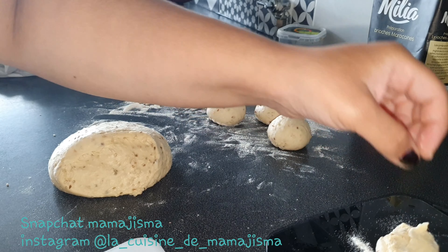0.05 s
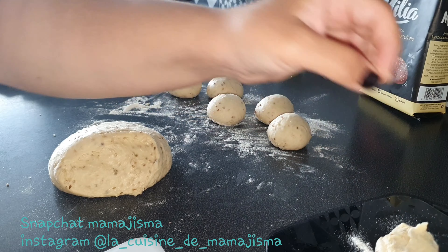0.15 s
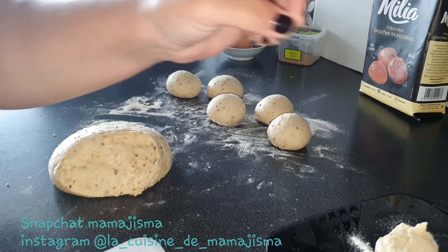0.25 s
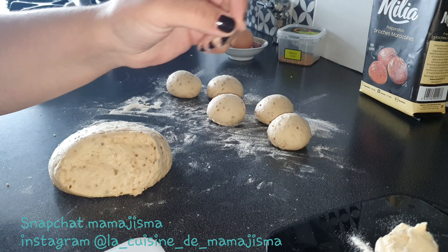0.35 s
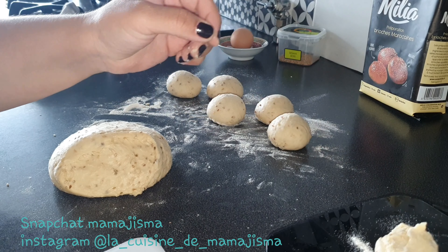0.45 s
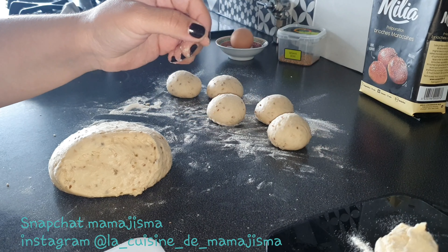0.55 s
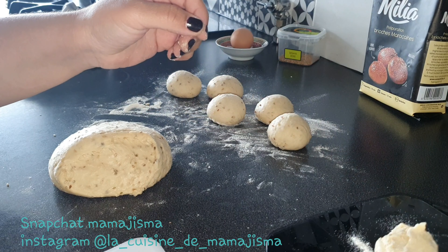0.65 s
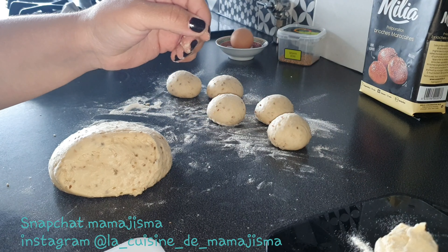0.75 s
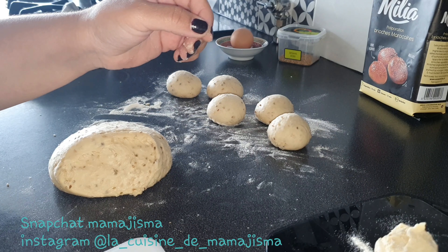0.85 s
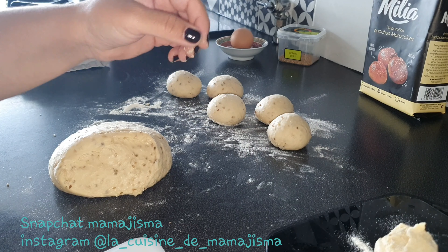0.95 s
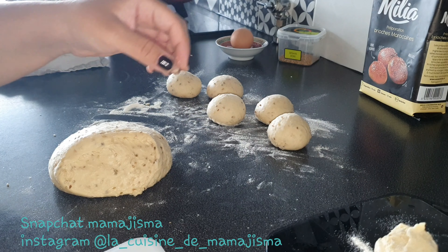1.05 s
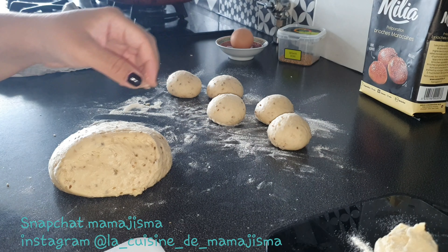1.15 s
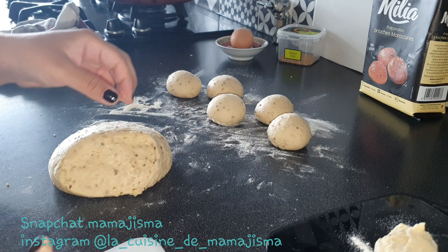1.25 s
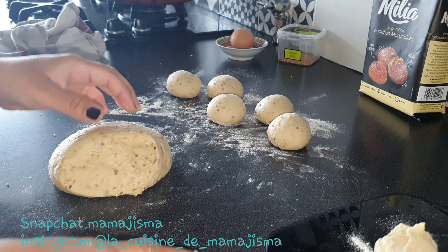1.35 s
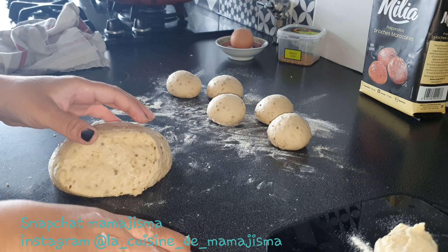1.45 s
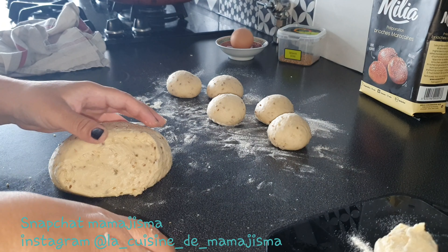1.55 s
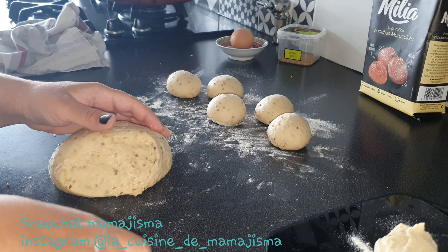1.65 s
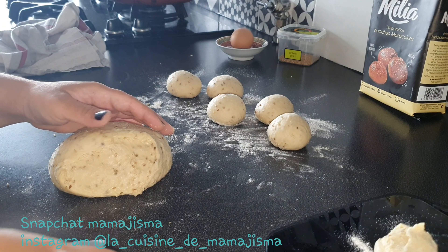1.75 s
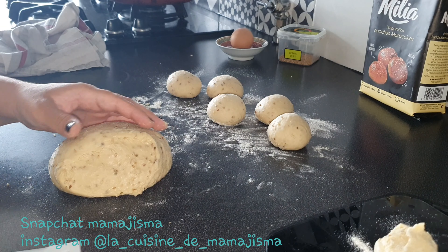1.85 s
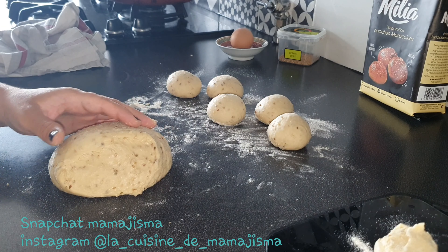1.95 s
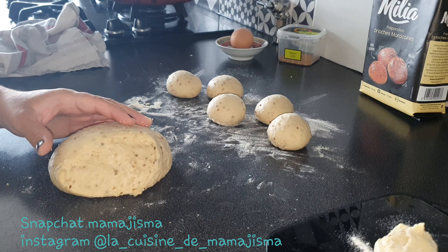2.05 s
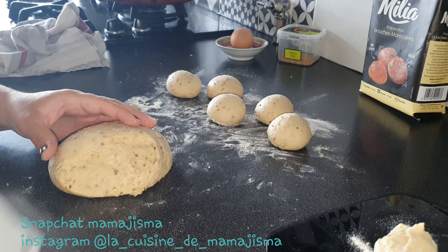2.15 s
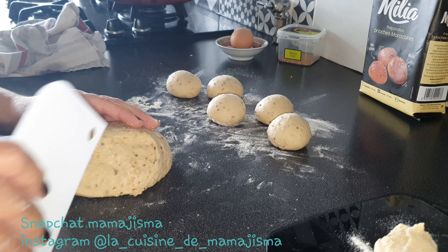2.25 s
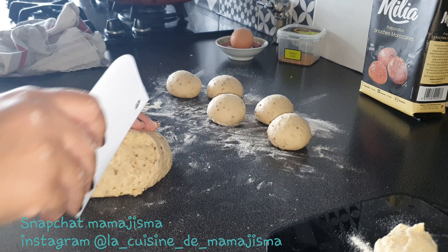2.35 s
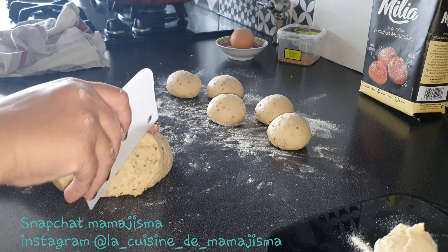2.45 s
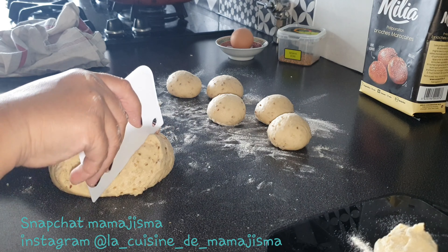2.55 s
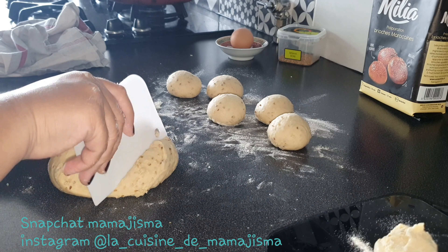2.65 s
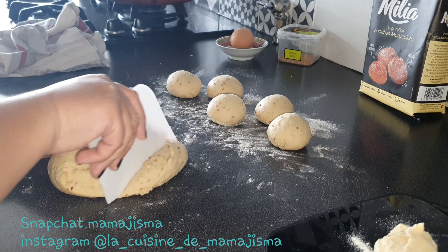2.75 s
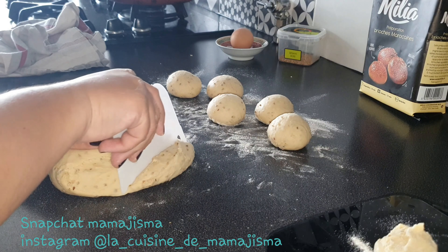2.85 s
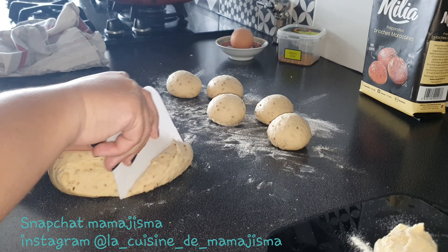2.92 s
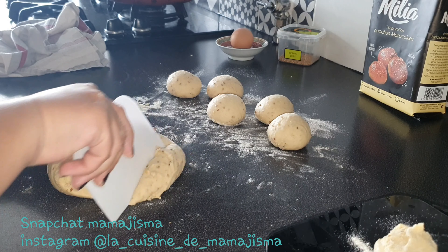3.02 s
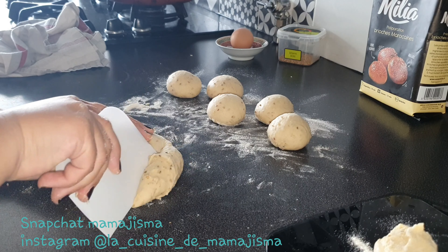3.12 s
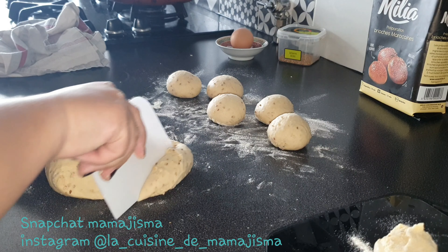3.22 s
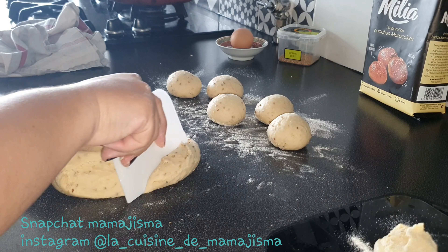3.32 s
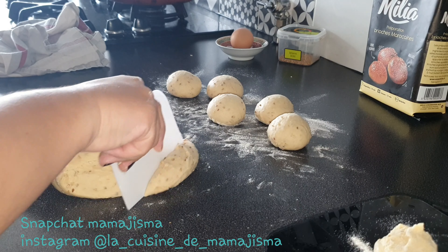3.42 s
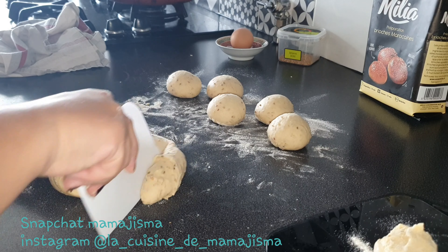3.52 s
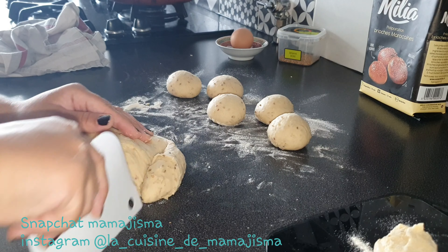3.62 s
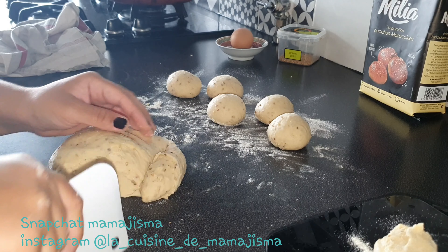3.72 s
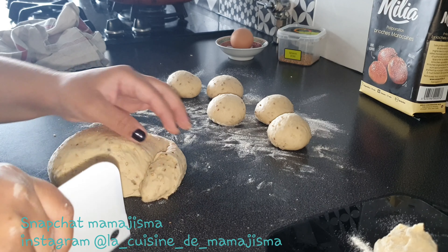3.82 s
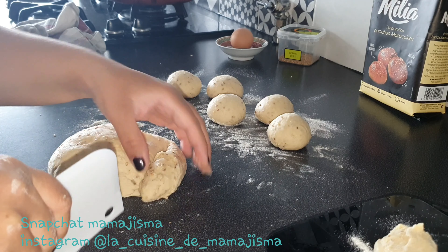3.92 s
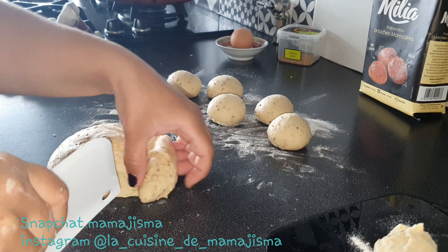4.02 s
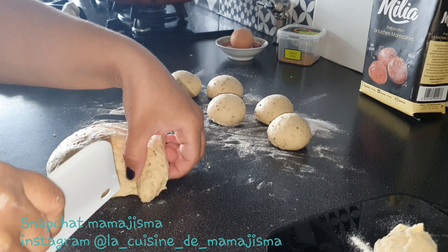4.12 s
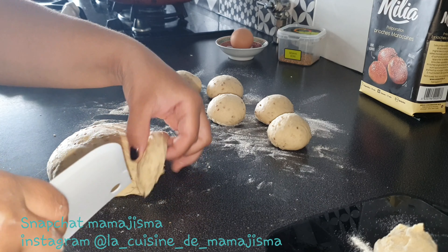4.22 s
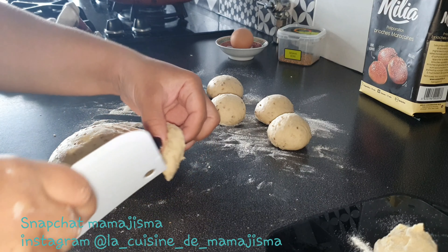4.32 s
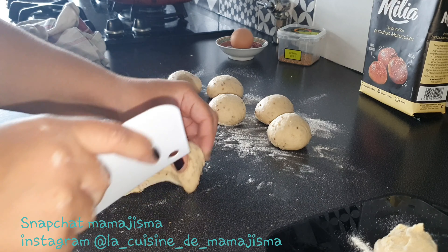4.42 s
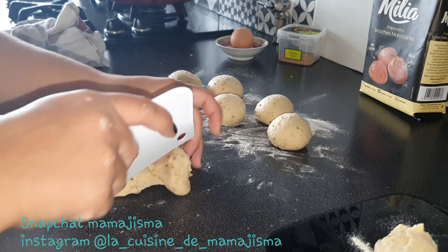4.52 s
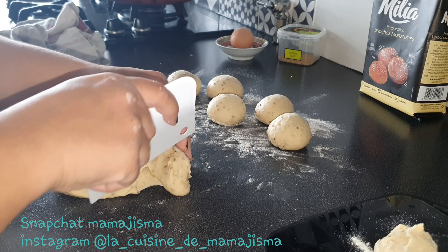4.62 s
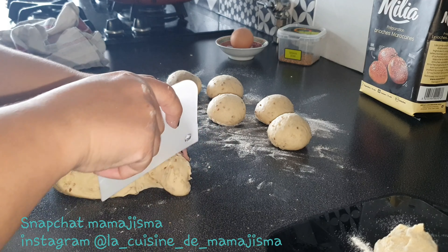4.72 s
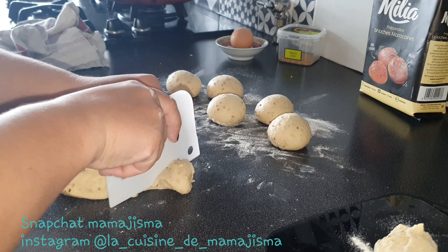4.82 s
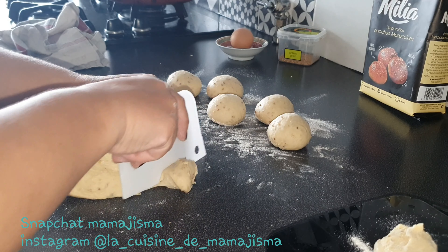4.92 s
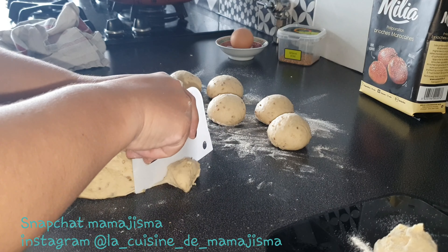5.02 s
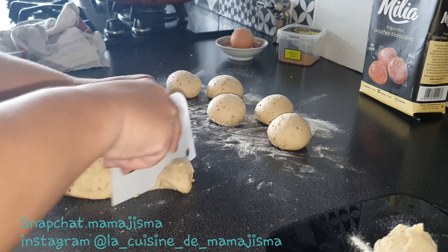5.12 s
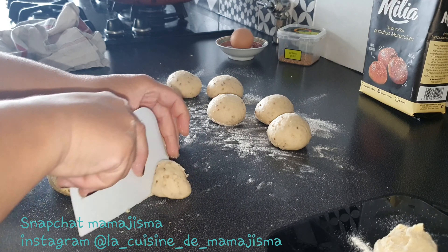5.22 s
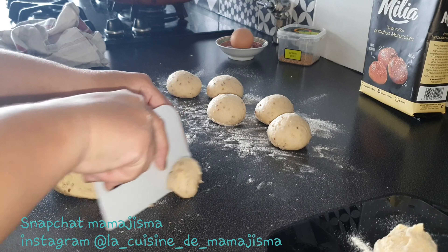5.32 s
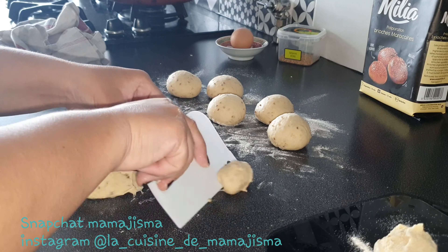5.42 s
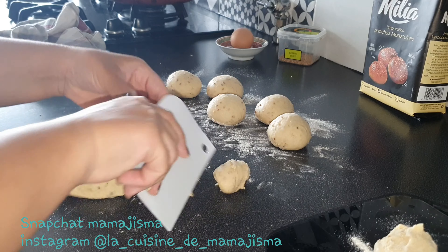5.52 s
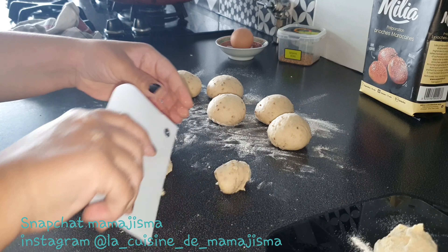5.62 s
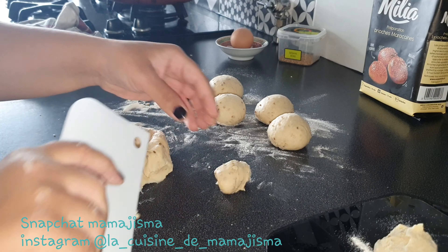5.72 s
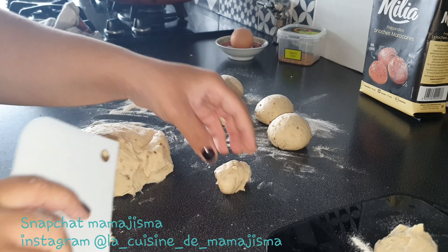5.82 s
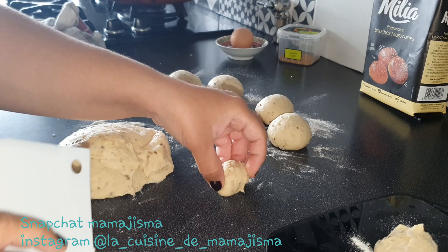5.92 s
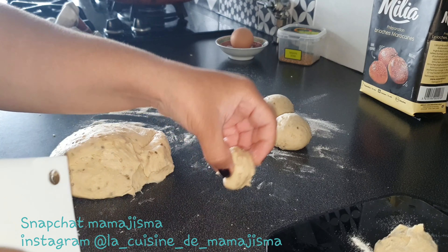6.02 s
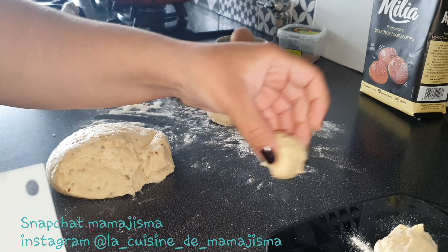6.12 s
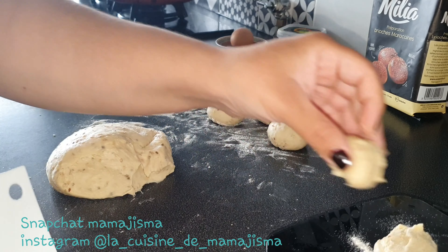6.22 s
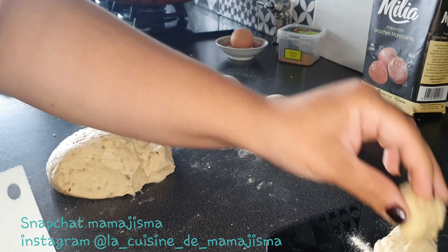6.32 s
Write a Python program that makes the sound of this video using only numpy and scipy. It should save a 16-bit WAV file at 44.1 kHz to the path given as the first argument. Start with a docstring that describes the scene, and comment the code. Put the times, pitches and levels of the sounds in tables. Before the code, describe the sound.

A hand softly pats dough, then a plastic scraper cuts through it, knocking and scraping on a kitchen worktop.

```python
"""A plastic scraper presses through a lump of dough, pulls free, presses in again and drags over the top.
Stick-slip friction drives its sound: dough damps the buried blade, while blows on the floured worktop
ring its modes. Before the cutting, a hand pats and strokes the dough, and soft thuds shake the worktop.
A small, hard-walled kitchen reverberates, and an appliance hums and beats low in the background."""
import sys
import numpy as np
from scipy import signal
from scipy.fft import rfft, irfft
from scipy.io import wavfile

SR = 44100
rng = np.random.default_rng(int(sys.argv[2]) if len(sys.argv) > 2 else 0)


def unload_wav(signal):
    """Save mono or channel-first audio to the path in sys.argv[1] as 16-bit WAV at rate SR, clipped to [-1, 1]."""
    wavfile.write(
        sys.argv[1],
        SR,
        np.round(np.clip(np.atleast_2d(signal).T, -1, 1) * 32767).astype(np.int16),
    )


N = 280917
TIME = np.arange(N) / SR


def cutting():
    """Viscous damping: clinging dough leaves the blade one hollow band, with a sticky crackle above."""
    # pushes and pulls in the dough: peak t/s, swell/s, fade/s, force level/dB, bite re force/dB
    cuts = [(2.76, 0.088, 0.075, -72, -2), (3.07, 0.031, 0.064, -62, 3.5),
            (3.138, 0.043, 0.038, -47.5, -7.5), (3.262, 0.026, .03, -55.5, -11),
            (3.306, 0.034, 0.039, -52.5, -7), (3.625, 0.095, 0.15, -58, -3),
            (3.73, 0.032, 0.053, -44.5, -4.5), (3.8, 0.027, 0.013, -43.5, -7.5),
            (3.978, 0.021, 0.037, -51.5, -12.5), (4.05, 0.044, 0.067, -56.5, -12),
            (4.31, 0.036, 0.093, -64, -6)]
    # spectrum of the buried blade: f/Hz, level/dB
    buried_spectrum = [(100, -26.5), (280, -13), (480, -8.5), (660, -1.5), (850, 2), (1020, -6.5),
                       (1250, -5), (1650, -9.5), (2100, -12.5), (6000, -32)]
    # spectrum of the sticky crackle: f/Hz, level/dB
    crackle_spectrum = [(800, -21.5), (1700, -8), (2400, -4.5), (3100, -4), (3900, -3.5), (5000, -9),
                        (6300, -7), (7500, -14), (10000, -21), (15000, -26)]
    force, bite = strokes(cuts)
    cling = unit(amp(1.8 * wander(70)))
    tearing, popping = slips(900, 3.3, hiss=.5), slips(1400, 3.8, hiss=.6)
    body = unit(colour(tearing, buried_spectrum)) * force
    crackle = colour(popping, crackle_spectrum) * bite
    return cling * (amp(0.5) * body + amp(5.0) * crackle)


def dragging():
    """Stick-slip friction: under one unsteady grip the blade drones, the edge rasps and flour fizzes."""
    # strokes on the worktop: peak t/s, swell/s, fade/s, force level/dB, bite and flour re force/dB
    drags = [(2.24, 0.027, 0.013, -58, 11.5, 6.5), (2.262, 0.018, 0.022, -51.5, -1.5, -14),
             (2.35, 0.048, 0.17, -73, 6, 5.5), (4.99, .04, 0.12, -59.5, -7.5, -24),
             (5.19, 0.051, 0.091, -56, 1.5, -8), (5.272, .018, 0.041, -40.5, -5, -10.5),
             (5.424, 0.043, 0.0089, -35, -4, -24), (5.485, 0.069, 0.026, -44.5, 5.5, 2.5),
             (5.62, 0.017, 0.064, -67.5, 11, 5), (5.78, 0.029, 0.072, -59.5, 1, -8.5),
             (5.9, 0.054, .03, -62, -4, -11), (6.03, 0.24, 0.66, -77, 0.5, 0)]
    # spectrum of the juddering blade: f/Hz, level/dB
    body_spectrum = [(100, -18.5), (260, -15), (470, -6), (640, -2.5), (870, -7), (1100, -5), (1370, 3.5),
                     (1650, -8.5), (2300, -7), (6000, -29.5)]
    # spectrum of the rasping edge: f/Hz, level/dB
    edge_spectrum = [(800, -15.5), (1900, 0.5), (2500, -1.5), (3150, 0.5), (3600, 0), (4500, -3.5),
                     (5500, -7.5), (6400, -4), (7500, -16), (10000, -21.5), (15000, -43)]
    # spectrum of flour under the edge: f/Hz, level/dB
    flour_spectrum = [(2000, -25), (5000, -12), (7000, -3), (9000, -7.5), (12500, -6), (15000, -16)]
    force, bite, dust = strokes(drags)
    judder, grit = slips(800, 3.8, hiss=.5), slips(1100, 4.8, hiss=.55)
    ring = blade_ring(hardness_db=0)
    resonance = signal.oaconvolve(judder, ring / np.linalg.norm(ring))[:N]
    body = unit(colour(judder + 0.35 * resonance, body_spectrum)) * force
    rasp = colour(grit, edge_spectrum) * bite
    flour = colour(slips(5000, 3.8, hiss=1.0), flour_spectrum) * dust
    grip = unit(amp(2.7 * wander(69)))
    return grip * (amp(4.0) * body + amp(5.5) * rasp + amp(4.5) * flour)


def knocks():
    """Impact excitation: each blow gives a dry tick, and the blade's modes take a moment to swing up."""
    # the blade striking the worktop: t/s, level/dB, hardness/(dB per octave), tick re ring/dB
    blows = [(2.327, -38, 6.5, -18), (3.688, -31, 1, 2.5), (3.785, -21.5, -11.5, -5.5),
             (3.809, -40, -6, -18), (3.82, -40, -13, -16), (4.86, -50, -1, -1), (4.91, -23.5, 8, -9.5),
             (5.019, -48.5, 2, 11.5), (5.193, -34.5, 12, 8.5), (5.26, -39.5, 6, 14.5),
             (5.648, -39, 11.5, 1.5), (5.967, -46, -2, 0), (6.159, -54.5, -7, -10)]
    # spectrum of the contact tick: f/Hz, level/dB
    tick_spectrum = [(300, -5), (1200, -26), (2400, 4.5), (4000, 0), (6200, -12), (8500, -21), (15000, -28)]
    out, t = np.zeros(N), np.arange(6000) / SR
    for start, db, hardness_db, tick_db in blows:
        ring = blade_ring(hardness_db) * (1 - np.exp(-t / 0.00054))
        tick = colour(rng.standard_normal(len(t)) * np.exp(-t / 0.0018), tick_spectrum)
        add(out, start, amp(db) * (ring / abs(ring).max() + amp(tick_db) * tick / abs(tick).max()))
    return out


def blade_ring(hardness_db, size=6000):
    """Free vibration: the blade rings as a sum of damped modes; a hard blow favours the high ones."""
    # modes of the blade held against the worktop: f/Hz, level/dB, T60/s
    modes = [(445, -12, 0.0082), (681, -0.5, 0.019), (822.6, 0, 0.035), (1074, 5.5, 0.013),
             (1216, 4, 0.013), (1320, -10.5, 0.022), (1520, 0.5, 0.012), (1974, -15, 0.024),
             (2233, -10.5, 0.022), (2890, -16, 0.011), (3840, -11, 0.0065), (6170, -18.5, 0.0034)]
    t = np.arange(size) / SR
    ring = np.zeros(size)
    for hz, db, t60 in modes:
        envelope = amp(db + hardness_db * np.log2(hz)) * np.exp(-np.log(1000) * t / t60)
        ring += envelope * np.sin(2 * np.pi * (hz * t + rng.random()))
    return ring


def scuffs():
    """Static friction gives way: blade or finger lets go in a rush of slips, loudest around one pitch."""
    # short catches: t/s, level/dB, length/s, peak f/Hz
    catches = [(0.235, -67, 0.003, 5000), (1.677, -39, 0.0042, 5170), (1.803, -50.5, 0.029, 3470),
               (2.322, -34.5, 0.0052, 4660), (3.591, -53, .007, 2560), (3.614, -43.5, 0.0052, 3380),
               (3.717, -40.5, 0.0091, 3430), (3.786, -38.5, 0.01, 4080), (4.308, -67, 0.0054, 4200),
               (4.329, -66, 0.013, 3420), (4.442, -56.5, 0.021, 3730), (5.258, -38, 0.0078, 3060),
               (5.351, -43, 0.014, 800), (5.42, -34.5, 0.011, 570), (5.461, -31.5, 0.0049, 4930),
               (5.486, -30.5, 0.0084, 5450)]
    out, grit = np.zeros(N), slips(3000, 5.9, hiss=0.2)
    for start, db, length, hz in catches:
        hump = [(hz / 8, -19), (hz * 0.78, -7), (hz, 0), (hz * 1.31, -9), (hz * 8, -32)]
        add(out, start, amp(db) * colour(burst(grit, start, length, rise=length / 5), hump))
    return out


def thuds():
    """Inelastic impact: dough lands bit by bit and pushes the worktop; a quicker slap reaches higher."""
    # dough patted or flopping down: t/s, level/dB, upper edge f/Hz, length/s
    landings = [(1.355, -40.5, 338, 0.021), (1.469, -47.5, 180, 0.04), (1.654, -43, 330, 0.065),
                (1.681, -41.5, 190, 0.031), (1.807, -46, 348, 0.038), (1.98, -53.5, 193, 0.11),
                (3.021, -60, 250, .05), (3.7, -48, 350, 0.035), (3.762, -52.5, 403, 0.093),
                (3.962, -47.5, 553, 0.033), (4.038, -37, 400, 0.018), (4.074, -46, 149, 0.022),
                (4.267, -52.5, 184, 0.063), (4.912, -48, 364, .025), (5.405, -52, 650, 0.016),
                (5.973, -57, 430, 0.036)]
    # response of the worktop: f/Hz, level/dB
    worktop_spectrum = [(35, -4), (60, 6), (82, -2), (110, 4), (145, -6.5), (180, -14), (230, 0),
                        (295, -16), (370, -1.5), (550, -3.5), (1100, 13.5), (3000, -71)]
    out = np.zeros(N)
    for start, db, edge_hz, length in landings:
        push = unit(colour(rng.standard_normal(N), worktop_spectrum, edge_hz))
        add(out, start, amp(db) * burst(push, start, length, rise=0.003))
    return signal.sosfilt(signal.butter(4, 1300, fs=SR, output="sos"), out)


def hand():
    """Sliding friction: dry skin whispers over floured dough and rasps where it grips."""
    # strokes of the hand: peak t/s, swell/s, fade/s, speed level/dB, grip re speed/dB
    rubs = [(1.24, 0.044, 0.2, -69.5, -14), (1.36, 0.1, 0.19, -67, -5), (1.495, 0.096, 0.12, -63.5, -5),
            (1.678, 0.011, 0.005, -48.5, -6), (1.72, .035, 0.11, -62.5, -4),
            (1.825, 0.078, 0.035, -62, -0.5), (2.002, 0.031, 0.048, -57.5, 5), (2.11, 0.053, 0.072, -62, 5),
            (2.9, 0.049, 0.067, -78.5, -15), (4.58, .11, 0.55, -73.5, -6)]
    # spectrum of sliding skin: f/Hz, level/dB
    skin_spectrum = [(150, -30.5), (400, -3), (1000, -5), (2000, -6.5), (4000, -8), (6600, -1.5),
                     (8200, -9), (12000, -7), (15000, -15)]
    # spectrum of gripping skin: f/Hz, level/dB
    grip_spectrum = [(500, -8.5), (2200, -13), (2800, 5), (3400, 4), (4100, -0.5), (5500, -7), (12000, -13)]
    speed, grip = strokes(rubs)
    whisper = colour(slips(4000, 0.7, hiss=1.7), skin_spectrum) * speed
    rasp = colour(slips(1500, 10.7, hiss=0.49), grip_spectrum) * grip
    return unit(amp(2.5 * wander(22))) * (amp(6.5) * whisper + amp(8.0) * rasp)


def fingers():
    """Band-limited friction noise: light touches swish in a wider band and squeak in a narrow one."""
    # finger touches: t/s, level/dB, length/s, centre f/Hz, bandwidth/Hz
    touches = [(.24, -76.5, 0.25, 6160, 3050), (1.27, -70, 0.081, 987, 90)]
    out = np.zeros(N)
    for start, db, length, hz, width in touches:
        band = unit(wander(width / 2) * np.cos(2 * np.pi * hz * TIME))
        add(out, start, amp(db) * burst(band, start, length, rise=length / 3, size=28000))
    return out


def kitchen(x, near_db, tail_db, lag_s, size=30000):
    """Reverberation: direct sound arrives on the left first, then worktop, boxes and walls reflect it."""
    # reverberation time of the room: f/Hz, T60/s
    decay_times = [(80, 0.58), (300, 0.5), (1000, 0.33), (2800, 0.4), (7000, 0.4), (15000, 0.35)]
    reflections = rng.choice([-1., 1.], (2, size)) * (rng.random((2, size)) < 4000 / SR)
    hz, t, (left, other) = signal.stft(reflections, SR, nperseg=256)
    coherence = 1 / (1 + (hz[:, None] / 560) ** 2)  # the channels are alike only in the bass
    field = np.array([left, coherence * left + np.sqrt(1 - coherence ** 2) * other])
    response = np.zeros((2, size))
    for db, t60, onset in [(near_db, .06, .002), (tail_db, read(decay_times, hz)[:, None], .012)]:
        envelope = np.exp(-np.log(1000) * t / t60) * (1 - np.exp(-t / onset))
        echo = signal.istft(field * envelope, SR, nperseg=256)[1][:, :size]
        response += amp(db) * echo / np.linalg.norm(echo, axis=1, keepdims=True)
    response[[0, 1], [0, round(lag_s * SR)]] += 1  # direct sound
    response /= np.linalg.norm(response, axis=1, keepdims=True)
    return signal.fftconvolve(x[None], response, axes=1)[:, :N]


def moving(x, near_db, tail_db, spots=8, spots_per_s=36):
    """Changing paths: echoes and left-right delay vary as the source fades from spot to spot."""
    out = np.zeros((2, N))
    for k in range(spots):
        distance = abs((TIME * spots_per_s - k + spots / 2) % spots - spots / 2)
        crossfade = np.cos(np.pi / 2 * np.minimum(distance, 1))
        out += kitchen(x * crossfade, near_db, tail_db, lag_s=rng.uniform(.00007, .00022))
    return out


def motor(mains_hz=50, beat_s=.64, beat_peak_s=.55):
    """Beating: the motor turns a little slower than the mains, so its octave beats with the mains buzz."""
    mains_cycles = mains_hz * TIME
    turns = mains_cycles - (TIME - beat_peak_s) / beat_s / 2
    shaft = amp(-60 + 3.2 * wander(3.3)) * np.sin(2 * np.pi * (turns + 0.036 * wander(4)))
    octave = amp(-68) * np.sin(2 * np.pi * 2 * turns)
    buzz = amp(-64) * np.sin(2 * np.pi * 2 * mains_cycles)
    return np.sqrt(2) * (shaft + octave + buzz)


def background():
    """Superposition: the appliance's wavering hum, alike in both channels, lies over rumble and hiss."""
    # faint tones of the appliance: f/Hz, bandwidth/Hz, level/dB
    tones = [(43.3, 1.1, -75), (82.5, 2.7, -66), (135, 1.6, -83.5), (390, 8, -82)]
    # spectrum of the ambient noise: f/Hz, level/dB
    air_spectrum = [(20, -20.5), (36, 0), (60, -3), (140, -1), (175, -12.5), (300, -16), (450, -26),
                    (1000, -34), (3000, -36.5), (6500, -42), (9000, -44.5), (15000, -42.5)]
    hum = np.zeros(N)
    for hz, width, db in tones:
        waver = wander(width / 2) + 1j * wander(width / 2)
        hum += amp(db) * (waver * np.exp(2j * np.pi * hz * TIME)).real
    common, apart = rng.standard_normal((2, N))
    apart = signal.sosfilt(signal.butter(1, 260, "high", fs=SR, output="sos"), apart)
    air = np.array([colour(common + side * apart, air_spectrum) for side in (1, -1)])
    return hum + motor() + amp(-66) * air


def strokes(table, swell_shape=1.46, fade_shape=0.92):
    """Power summation of strokes that swell and fade: the main gain, then that of each layer on it."""
    power = 0
    for peak, swell, fade, db, *layers_db in table:
        t = TIME - peak
        flank = np.where(t < 0, (abs(t) / swell) ** swell_shape, (abs(t) / fade) ** fade_shape)
        gains = amp(db + np.array([0, *layers_db]))
        power = power + np.outer(gains, np.exp(-np.minimum(flank, 20))) ** 2
    return np.sqrt(power)


def slips(per_s, spread_db, hiss):
    """Shot noise: tiny stick-slip clicks of uneven size over a smooth hiss."""
    sizes = amp(spread_db * np.minimum(rng.exponential(1, N), 4)) * rng.choice([-1, 1], N)
    clicks = unit(sizes * (rng.random(N) < per_s / SR))
    return unit(clicks + hiss * rng.standard_normal(N))


def burst(source, start, length, rise, size=16000):
    """A transient: a piece of the source that swells quickly and dies away."""
    t = np.arange(size) / SR
    shape = (1 - np.exp(-t / rise)) * np.exp(-(t / length) ** 2)
    return np.roll(source, -round(start * SR))[:size] * shape / shape.max()


def colour(x, spectrum, edge_hz=None, size=4096):
    """Minimum-phase filtering at unit power gain with this spectrum, dulled above an optional edge."""
    hz = abs(np.fft.fftfreq(size, 1 / SR)) + 1
    gain = amp(read(spectrum, hz))
    if edge_hz:
        gain = gain / np.sqrt(1 + (hz / edge_hz) ** 6)
    log_gain = np.log(unit(gain) + 1e-5)
    taps = np.fft.ifft(np.exp(np.conj(signal.hilbert(log_gain)))).real
    return signal.oaconvolve(x, taps[:size // 2])[:len(x)]


def wander(hz):
    """Random fluctuation of unit RMS, up to about hz."""
    low_pass = np.exp(-(np.fft.rfftfreq(N, 1 / SR) / hz) ** 2)
    return unit(irfft(rfft(rng.standard_normal(N)) * low_pass, N))


def read(points, hz):
    """Interpolation of a table on a log-frequency axis."""
    f, value = np.transpose(points)
    return np.interp(np.log(hz + 1), np.log(f), value)


def amp(db):
    return 10 ** (np.asarray(db) / 20)


def unit(x):
    return x / np.sqrt(np.mean(x ** 2) + 1e-20)


def add(mix, start, sound):
    part = mix[round(start * SR):][:len(sound)]
    part += sound[:len(part)]


def scene():
    """Superposition: friction, blows and thuds sound through the kitchen, over the background."""
    friction = cutting() + dragging() + hand() + fingers() + scuffs()
    rubbing = moving(friction, near_db=3.0, tail_db=-2.5) * amp([[.2], [-.2]])
    blows = kitchen(knocks(), near_db=-7.0, tail_db=-4.0, lag_s=.00012)
    bumps = kitchen(thuds(), near_db=-3, tail_db=-4.5, lag_s=.00028) * amp([[-.9], [.9]])
    return rubbing + blows + bumps + background()


def record(dry, low_hz=30, high_hz=15450):
    """Band limiting: filters remove the deepest rumble and the highest treble."""
    dry = signal.sosfilt(signal.butter(4, low_hz, "high", fs=SR, output="sos"), dry)
    low_pass = signal.firwin(511, high_hz, window=("kaiser", 9), fs=SR)
    return signal.oaconvolve(dry, low_pass[None], "same")


dry = scene()
out = record(dry)
unload_wav(out)
```